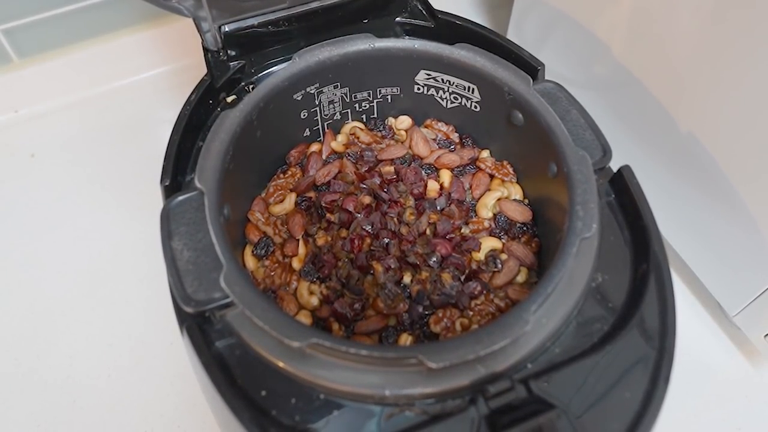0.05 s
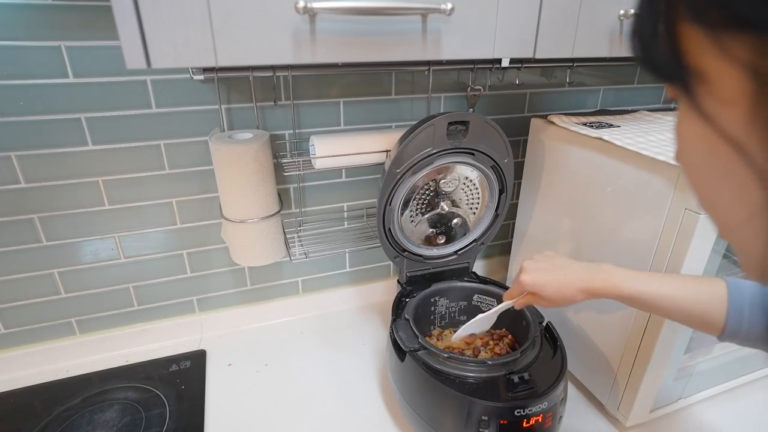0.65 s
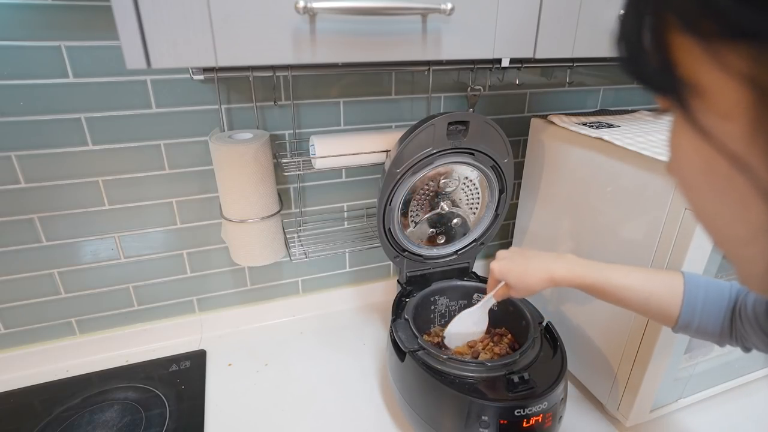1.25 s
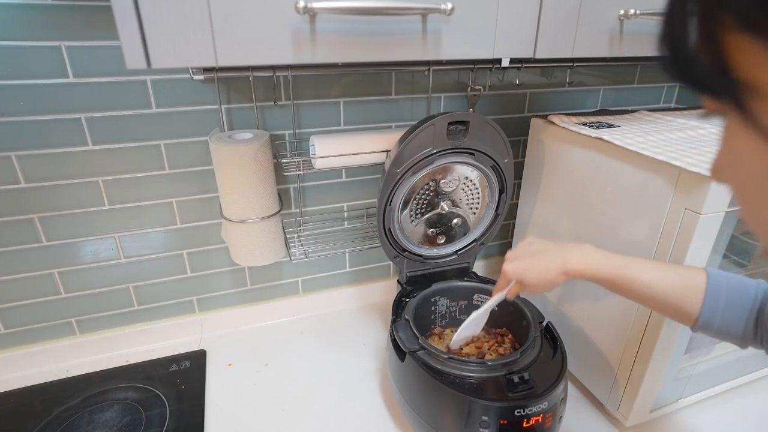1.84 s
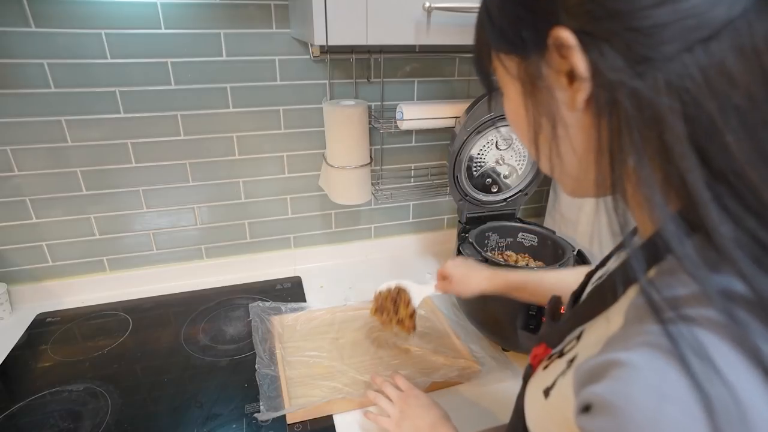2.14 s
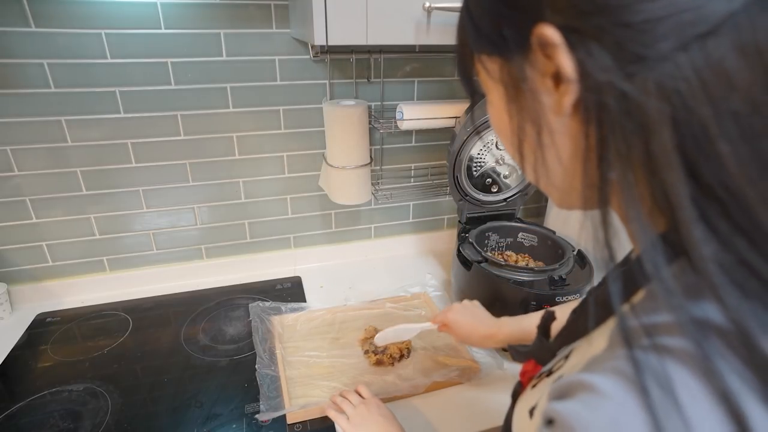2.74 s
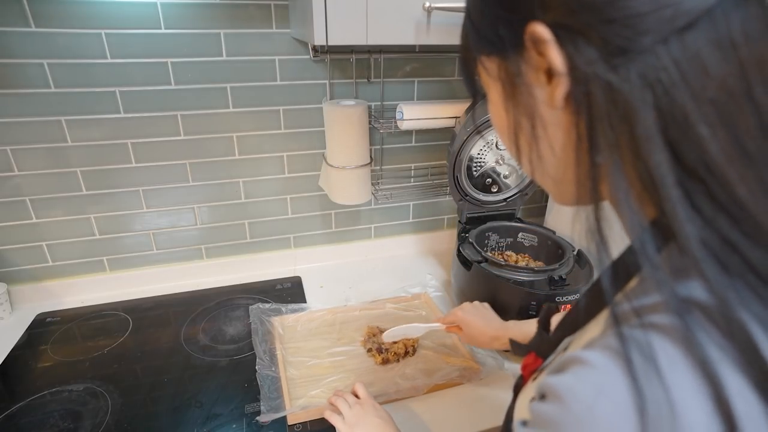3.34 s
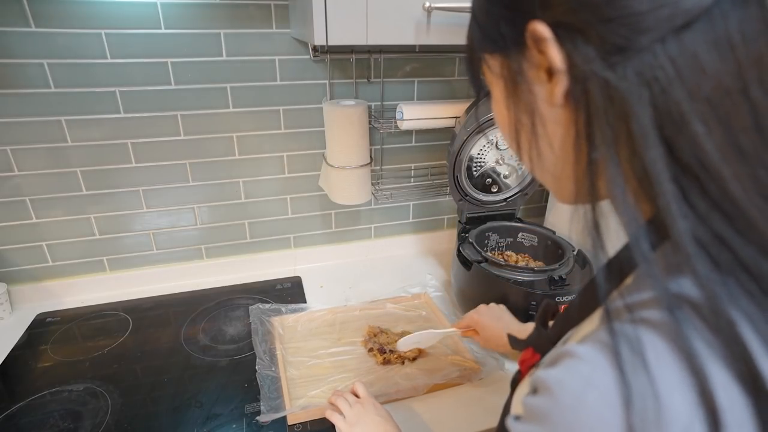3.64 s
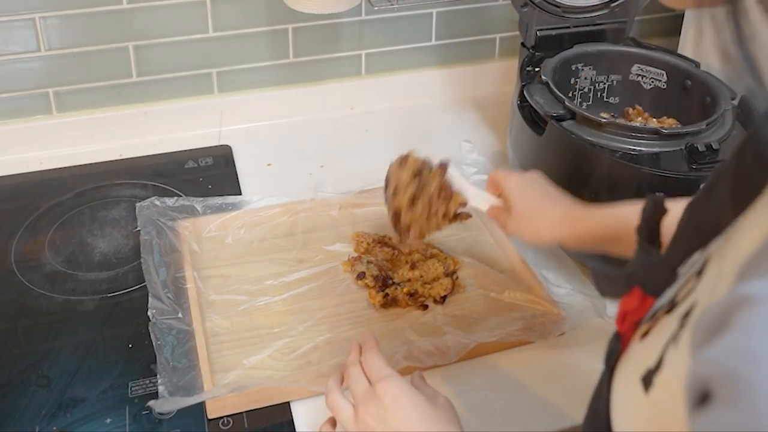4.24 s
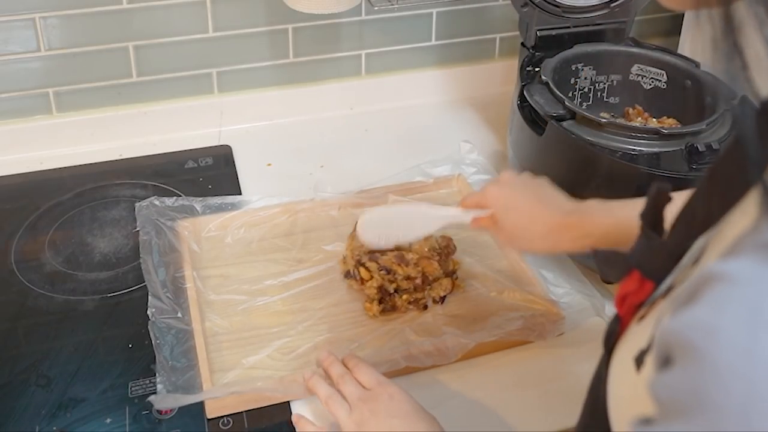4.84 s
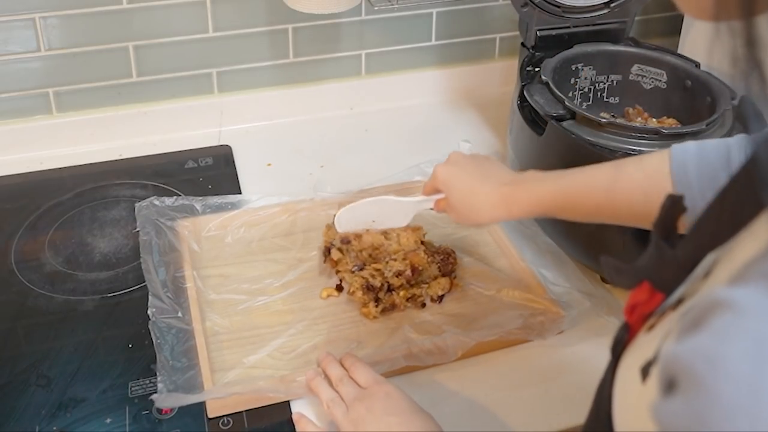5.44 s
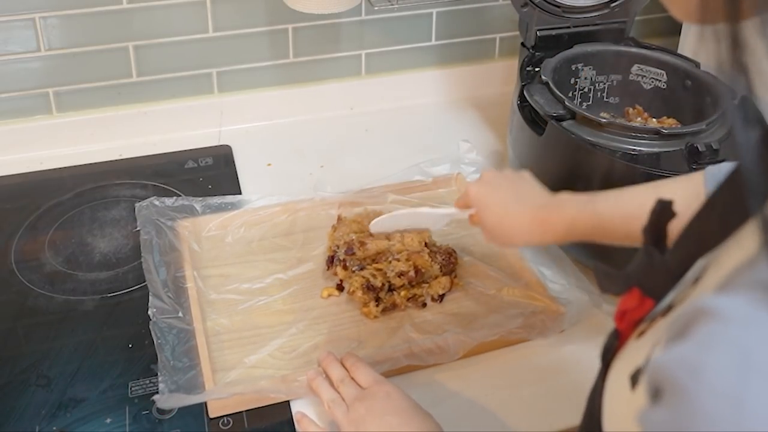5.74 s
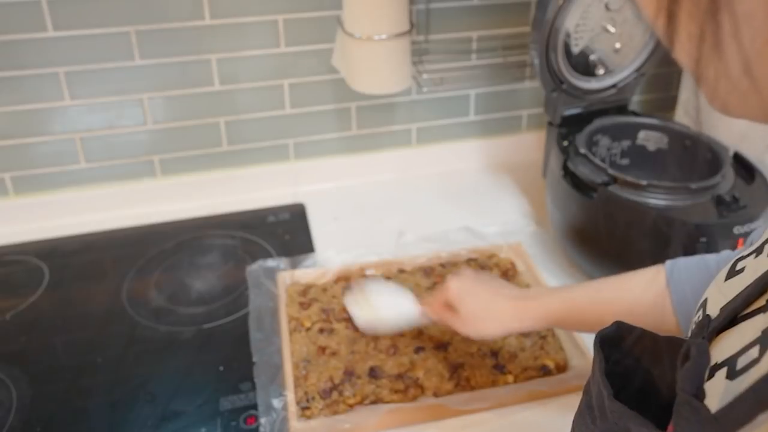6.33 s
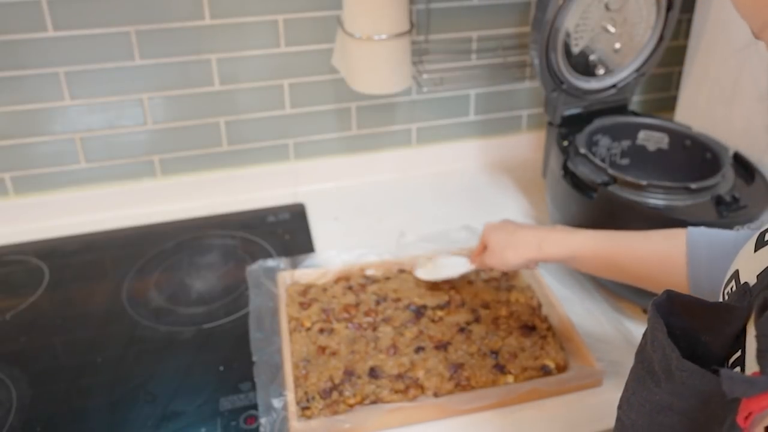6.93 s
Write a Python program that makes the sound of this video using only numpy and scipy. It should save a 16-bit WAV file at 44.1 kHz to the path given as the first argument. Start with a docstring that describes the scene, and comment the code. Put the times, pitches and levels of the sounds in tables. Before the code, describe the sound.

After a soft hiss, thin whine and small ticks from a rice cooker, a plastic paddle knocks dully in the pot and drags through sticky rice. The rice crackles and squishes as it is pressed onto a wooden tray lined with plastic film. Near the end the paddle knocks hard on the tray and raps it several more times. Everything is close and almost mono, with a short echo from a small tiled kitchen.

```python
"""First come a soft hiss, a thin whine, small ticks and a brief rub on a rice cooker. Then a plastic
paddle knocks dully in the pot and drags through sticky rice. The rice lands on a wooden tray lined
with plastic film, and crackles and squishes as it is pressed and peeled. The paddle knocks on the
nearly empty tray, and at the end raps on the packed one. Each blow makes the pot or tray ring, and
a small tiled kitchen echoes it. Everything is close and almost mono."""
import sys
import numpy as np
from scipy import signal
from scipy.fft import rfft, irfft, next_fast_len
from scipy.io import wavfile
from scipy.ndimage import uniform_filter1d

SR = 44100
rng = np.random.default_rng(int(sys.argv[2]) if len(sys.argv) > 2 else 0)


def output_pcm(signal):
    """Save a mono or channel-first signal as 16-bit PCM at the path in sys.argv[1].

    Samples are clipped to [-1, 1] before scaling.
    """
    pcm = np.clip(np.atleast_2d(signal).T, -1, 1) * 32767
    wavfile.write(sys.argv[1], SR, np.round(pcm).astype(np.int16))


N = 312265

# Blows of the paddle. Each row: start in seconds, level in dB, treble in dB (higher is brighter).
POT_BLOWS = [(0.636, -32, -19.5), (0.887, -13.5, -26.5), (0.949, -15, -9), (0.953, -9, -18.5),
             (0.96, -10, -24.5), (1.059, -26.5, -24), (1.283, -25.5, -31), (1.414, -37, -29),
             (1.454, -31.5, -33), (1.546, -14.5, -16.5), (1.563, -12.5, -20), (1.574, -5.5, -24.5),
             (1.595, -13.5, -24.5), (1.711, -19, -23)]
EMPTY_TRAY_BLOWS = [(2.284, -13.5, -22.5), (2.409, -16, -17), (3.255, -37.5, -20), (5.767, -8, -13),
                    (5.774, 3, -9.5), (6.046, -2.5, -10.5), (6.05, 1.5, -12.5), (6.063, -1.5, -26.5),
                    (6.068, -1, -21.5), (6.075, -9, -13)]
PACKED_TRAY_BLOWS = [(6.424, -9, -10), (6.637, -29.5, -2.5), (6.656, 2.5, -9), (6.731, -20, -10),
                     (6.872, 0, -10), (6.974, -10.5, -9)]
# Lighter touches. Each row: start in seconds, level in dB.
TIP_TAPS = [(6.4242, -7)]
COOKER_RUBS = [(0.27, -27)]
# Small ticks and a faint knock by the cooker, then snaps of film and sticky grains.
# Each row: start in seconds, level in dB, pitch in Hz.
TICKS_AND_SNAPS = [(0.125, -27, 8240), (0.17, -24.5, 6800), (0.171, -32.5, 700), (0.2377, -26, 7460),
                   (0.3763, -29.5, 3750), (0.402, -34.5, 2000), (0.476, -32, 1760), (1.192, -26.5, 2340),
                   (1.697, -26, 6000), (2.658, -27, 12000), (3.2782, -29, 11960), (3.4972, -23, 13300),
                   (4.3858, -19, 8720), (4.375, -6, 8000), (4.413, -16.5, 7600), (4.4236, -7.5, 11100),
                   (5.002, -30, 2130), (5.441, -19.5, 8540)]
# Strokes that swell and fade. Each row: start in seconds, rise time in seconds, level in dB.
DIG_STROKES = [(.97, .06, -58), (1.08, 0.088, -45.5), (1.19, 0.065, -52), (1.62, 0.11, -44.5),
               (1.73, 0.053, -48.5), (1.87, 0.064, -51.5)]  # through the rice in the pot
PRESS_STROKES = [(2.264, 0.016, -26.5), (2.33, 0.083, -31.5), (2.47, 0.023, -38.5), (2.56, 0.063, -45),
                 (2.651, .011, -39), (2.69, 0.026, -29.5), (2.79, .047, -29.5), (3.085, 0.075, -33.5),
                 (3.22, 0.046, -39.5), (3.325, 0.01, -45), (3.38, 0.07, -33), (3.49, 0.027, -34),
                 (3.668, 0.041, -38.5), (4.502, 0.006, -45.5), (4.73, 0.082, -49), (4.86, 0.055, -44),
                 (4.99, 0.01, -43.5), (5.03, 0.077, -43.5), (5.11, .085, -40.5), (5.235, 0.03, -42.5),
                 (5.428, .014, -39), (5.45, 0.034, -40), (5.555, 0.016, -44), (5.71, 0.074, -32.5),
                 (5.815, 0.037, -34), (6.0, 0.097, -32.5), (6.125, 0.013, -37.5)]  # pressing or peeling rice on the film
SQUISH_STROKES = [(2.272, 0.0094, -30.5), (2.395, 0.022, -37), (3.415, 0.027, -42), (5.14, 0.019, -33),
                  (5.185, .035, -41)]  # flattening the lump
LANDING_STROKES = [(4.371, 0.0023, -38), (4.405, 0.011, -43.5)]  # a scoop settling on the film

# The notes heard when each object is struck; the tray's include a few likely from the worktop or room.
# Each row: pitch in Hz, level in dB, seconds to fade by 60 dB.
POT_NOTES = [(98.6, -21, 0.25), (133, -18, 0.14), (195, -14.5, 0.15), (243.6, 2, 0.072), (278, -11, 0.14),
             (327, -3.5, 0.11), (416, -9, 0.052), (438, 9.5, 0.032), (576, 0, 0.034), (647, -4.5, 0.11),
             (909, -0.5, 0.095), (1190, 14.5, 0.023)]
EMPTY_TRAY_NOTES = [(303.7, -12, 0.073), (494, -37, 0.018), (564.5, -3.5, 0.056), (652.7, 1, 0.092),
                    (796, -3.5, 0.066), (886, -15.5, 0.14), (1103, -3, 0.03), (1380, -9, 0.057),
                    (1710, 1, 0.028), (1803, -8.5, 0.031), (2120, -25, 0.032), (2340, -4, .025),
                    (2664, -3, 0.06), (3080, -33, 0.026)]
PACKED_TRAY_NOTES = [(432, -24, 0.13), (573.7, 2, 0.095), (600.4, 0.5, 0.088), (663, -16, 0.26),
                     (791, -20, 0.11), (907, -21, 0.084), (1026, -1, 0.027), (1150, 3, 0.023),
                     (1440, -22, 0.0077), (1770, -8, 0.071), (2110, -18.5, 0.039), (2447, -3, 0.035),
                     (2750, -45, 0.01), (4000, -9, 0.0062)]
TIP_NOTES = [(1466, -8, 0.057), (1526, -6, 0.043), (3710, -1, 0.0073), (4270, -5.5, 0.015),
             (10500, -8, 0.0044)]
BLADE_NOTES = [(620, -6.5, 0.071), (714, 1.5, 0.13), (804, -7, .07), (922, 3, 0.075), (1370, -13, .03),
               (1770, -3, 0.025)]
COOKER_NOTES = [(548, 2.5, 0.028), (820, -8, .02), (1100, 5, .03), (1140, -4, 0.058)]

# The tone colour of each noise, from bass to treble. Each row: frequency in Hz, strength there in dB.
POT_CLACK_COLOUR = [(150, -18.5), (600, 0), (1900, -1), (3200, -8), (5000, -15), (9000, -14.5),
                    (16000, -25)]  # the paddle's own short ring, on the pot
TRAY_CLACK_COLOUR = [(150, -26.5), (600, -8.5), (1500, 1), (2600, -5.5), (4300, -13), (6000, -22.5),
                     (9000, -33), (16000, -45)]  # the same, on the tray
CRACKLE_COLOUR = [(180, -51), (300, -18.5), (656, -9.5), (885, -9.5), (1100, -11.5), (1230, -9),
                  (1640, -9.5), (1900, -9.5), (2030, -8.5), (3830, -7.5), (14500, -4.5), (16000, -5.5)]
DRAG_COLOUR = [(35, -41.5), (60, -6), (202, -1.5), (255, -20), (327, 3), (396, -3), (778, -15), (1500, -15),
               (2120, -15.5), (3240, -27), (6000, -22), (7800, -51), (13200, -120)]
SQUISH_COLOUR = [(35, -55), (60, -18.5), (279, -16.5), (322, -5.5), (428, -15.5), (594, 1.5), (932, -8.5),
                 (1220, -3.5), (1560, -16.5), (1760, -3), (2160, -20), (2540, -13), (8000, -30),
                 (10400, -55), (17600, -120)]
CRINKLE_COLOUR = [(300, -20), (1200, -10), (2500, -5.5), (4500, -2), (9000, -3), (16000, -6.5)]
THUD_COLOUR = [(25, -17), (60, -14), (120, -7), (190, 1.5), (280, 1), (500, -23), (2000, -80)]
ECHO_COLOUR = [(100, 8.5), (300, 9), (570, -3.5), (900, 4), (1300, -4), (3500, -1.5), (9000, 3),
               (16000, -0.5)]
ROOM_HISS_COLOUR = [(12, -41), (20, -7.5), (98, -6), (198, -9), (388, -8.5), (698, -8.5), (897, -7),
                    (1660, -14), (1910, -15.5), (2460, -13), (2670, -15), (6010, -16.5), (7950, -12),
                    (10200, -16.5), (16000, -10.5)]
EARLY_HISS_COLOUR = [(12, -23), (20, 3.5), (802, -5), (897, -7.5), (1030, -2.5), (1860, -5.5),
                     (2260, -7.5), (3340, -6.5), (6010, -7.5), (8180, -1.5), (9950, -9), (13900, -3),
                     (16000, -6)]
RUMBLE_COLOUR = [(25, -24), (60, -1), (110, -2), (250, -8), (700, -17), (3000, -45), (16000, -71.5)]

# How long the kitchen echoes. Each row: frequency in Hz, seconds to fade by 60 dB.
ECHO_TIMES = [(150, 0.54), (550, 0.46), (1400, 0.51), (3700, 0.46), (10000, 0.42), (16000, 0.57)]
# A thin electrical whine. Each row: multiple of WHINE_HZ, level in dB after the first 0.38 s.
WHINE_TONES = [(5, -74.5), (9, -78), (18, -70.5), (20, -76.5), (21, -82), (22, -72), (23, -78), (25, -73),
               (34, -80), (36, -77), (37, -76), (40, -79)]
# How wide the hiss is. Each row: frequency in Hz, level of the sides against the middle in dB.
HISS_WIDTH = [(60, -3.5), (110, -7), (200, -6.5), (380, -8), (700, -11.5), (1290, -11.5), (2380, -9.5),
              (4400, -7), (8120, -10.5), (15000, -10)]

WHINE_HZ, TOP_HZ = 375, 15900


def paddle_knocks(blows, notes, clack_colour, ring_db, clack_db, clack_fade_s, contact_hz, low_cut_hz,
                  echo_db, ring_echo_db):
    """Each blow rings the pot or tray and clacks the paddle; harder contact sounds brighter."""
    track, t = np.zeros(N), np.arange(SR // 7) / SR
    bass_cut = signal.butter(3, low_cut_hz, "high", fs=SR)  # a small object gives off little bass
    for start, db, treble_db in blows:
        body = amp(db + ring_db) * ring(notes, t, contact_hz * amp(treble_db / 2))
        clack_fade = amp(db + clack_db + treble_db - 60 * t / clack_fade_s)
        clack = clack_fade * coloured(rng.standard_normal(len(t)), clack_colour)
        body, clack = signal.lfilter(*bass_cut, [body, clack])
        add(track, start, body + clack)
        # The echo takes more of the clack than of the ring, so it sounds like a broad wash.
        add(track, start, kitchen_echo(amp(ring_echo_db) * body + clack, echo_db))
    return track


def tip_click():
    """The paddle's tip catches the tray's frame and rings with a short, bright click."""
    track, t = np.zeros(N), np.arange(SR // 7) / SR
    for start, db in TIP_TAPS:
        click = amp(db + 0.5) * ring(TIP_NOTES, t, contact_hz=15000)
        add(track, start, click)
        add(track, start, kitchen_echo(click))
    return track


def blade_judder(start_s=6.08, length_s=0.18, level_db=-27, fade_db_per_s=85):
    """After a burst of hard blows the blade skips across the film; each tiny slip makes it ring."""
    t, age = np.arange(SR // 7) / SR, np.arange(N) / SR - start_s
    touching = (age > 0) * (age < length_s)
    pressure = touching * amp(level_db - fade_db_per_s * np.abs(age))
    slips = pressure * ticks(per_second=460, spread_db=1.5)
    bass_cut = signal.butter(2, 450, "high", fs=SR)
    blade = signal.lfilter(*bass_cut, ring(BLADE_NOTES, t, contact_hz=1954))
    return signal.fftconvolve(slips, blade / np.linalg.norm(blade))[:N]


def sticky_rice(fizz_hz=9500):
    """Rice drags along the pot's wall and crackles on the film; a strong peel adds a finer fizz."""
    digging = strokes(DIG_STROKES, fade_db_per_s=111)
    pressing = strokes(PRESS_STROKES, fade_db_per_s=145)
    crackle = sticky_crackle()
    fizz = unit(filtered(crackle, lambda hz: 1 / (1 + (fizz_hz / (hz + 1)) ** 4)))
    fizz_gain = amp(-6) * np.sqrt(pressing / amp(-31))
    drag = coloured(ticks(per_second=400, spread_db=0), DRAG_COLOUR)
    in_pot = digging * (amp(1) * drag + amp(-11) * crackle)
    on_film = pressing * (amp(-2) * crackle + fizz_gain * fizz)
    return in_pot + on_film


def sticky_crackle():
    """Thousands of wet contacts let go in clumps and blur into a hiss; a few stand out."""
    clumps = np.interp(np.arange(N), np.linspace(0, N, N // 350), rng.standard_normal(N // 350))
    fine = ticks(per_second=5000, spread_db=3.5) * amp(2.3 * clumps)
    standouts = amp(-11) * ticks(per_second=130, spread_db=2.5)
    blur = amp(-3) * rng.standard_normal(N)
    return coloured(fine + standouts + blur, CRACKLE_COLOUR)


def rice_squish():
    """Soft grains collapse against the wood as the lump is flattened."""
    pressure = amp(-1) * strokes(SQUISH_STROKES, fade_db_per_s=215)
    return pressure * coloured(ticks(per_second=2000, spread_db=5.5), SQUISH_COLOUR)


def ticks_and_snaps(decay_s=0.00045, sharpness=0.56):
    """Ticks and a faint knock by the cooker; later a crease of film flips or a starch thread breaks."""
    track, t = np.zeros(N), np.arange(SR // 50) / SR
    for start, db, pitch_hz in TICKS_AND_SNAPS:
        burst = rng.standard_normal(len(t)) * np.exp(-t / decay_s)
        # Keep a broad band around the pitch.
        click = filtered(
            burst, lambda hz: (1 + 1j * sharpness * (hz / pitch_hz - pitch_hz / (hz + 1))) ** -2)
        add(track, start, amp(db - 1) * click / np.max(np.abs(click)))
    return track + kitchen_echo(track)[:N]


def film_crinkle():
    """Small creases in the film give way as a scoop of rice lands on it."""
    weight = amp(1) * strokes(LANDING_STROKES, fade_db_per_s=172)
    return weight * coloured(ticks(per_second=1500, spread_db=3.5), CRINKLE_COLOUR)


def cooker_rub(length_s=0.013):
    """A brief rub on the cooker's shell gives one rough, hollow note."""
    track, t = np.zeros(N), np.arange(SR // 7) / SR
    for start, db in COOKER_RUBS:
        friction = rng.standard_normal(len(t)) * np.exp(-(t / length_s) ** 4)
        rub = signal.fftconvolve(friction, ring(COOKER_NOTES, t, contact_hz=1550))
        add(track, start, amp(db) * rub / np.max(np.abs(rub)))
    return track + kitchen_echo(track)[:N]


def counter_thuds(empty_db=-46, packed_db=-50, fade_s=0.29):
    """Each blow on the tray passes a soft, low thud to the counter; packed rice cushions it."""
    track, t = np.zeros(N), np.arange(SR // 3) / SR
    for blows, gain_db in (EMPTY_TRAY_BLOWS, empty_db), (PACKED_TRAY_BLOWS, packed_db):
        for start, db, _ in blows:
            thud = coloured(rng.standard_normal(len(t)), THUD_COLOUR)
            add(track, start, amp(db + gain_db - 60 * t / fade_s) * thud)
    return track


def kitchen_echo(sound, echo_db=-6, build_s=0.00045):
    """The tiled walls throw a sound back as a fading wash, a little different for every spot."""
    hz, t, noise = signal.stft(rng.standard_normal(SR * 2 // 5), SR, nperseg=256)
    tail_db = value_at(ECHO_COLOUR, hz)[:, None] - 60 * t / value_at(ECHO_TIMES, hz)[:, None]
    _, tail = signal.istft(noise * amp(tail_db), SR, nperseg=256)
    age = np.arange(len(tail)) / SR
    tail *= 1 - np.exp(-(age / build_s) ** 2)
    return amp(echo_db) * signal.fftconvolve(sound, tail / np.linalg.norm(tail))


def background(early_until_s=0.38, early_whine_db=10, rumble_from_s=6.424):
    """Hiss and a thin whine, stronger for the first 0.38 s and then dropping; a low rumble under the last raps."""
    t = np.arange(N) / SR
    early = uniform_filter1d(1. * (t < early_until_s), size=400)
    whine = sum(amp(db) * np.sqrt(2) * np.sin(2 * np.pi * (multiple * WHINE_HZ * t + rng.random()))
                for multiple, db in WHINE_TONES)
    whine *= amp(early * early_whine_db)
    room_hiss = amp(-56.5) * coloured(rng.standard_normal((2, N)), ROOM_HISS_COLOUR)
    early_hiss = amp(-46.5) * coloured(rng.standard_normal((2, N)), EARLY_HISS_COLOUR)
    middle, side = (1 - early) * room_hiss + early * early_hiss
    side = filtered(side, lambda hz: amp(value_at(HISS_WIDTH, hz)))
    rumble = amp(-55) * (t > rumble_from_s) * coloured(rng.standard_normal(N), RUMBLE_COLOUR)
    return middle + whine + rumble + np.array([side, -side])


def ring(notes, t, contact_hz):
    """The fading notes heard after a blow, with a peak of 1; those above contact_hz are softened."""
    hz, db, fade_s = np.transpose(notes)[:, :, None]
    tones = amp(db - 60 * t / fade_s) * np.cos(2 * np.pi * hz * t)
    treble_cut = signal.butter(3, min(contact_hz, TOP_HZ), fs=SR)
    sound = signal.lfilter(*treble_cut, tones.sum(axis=0))
    return sound / np.max(np.abs(sound))


def strokes(table, fade_db_per_s, hold_s=0.0052, let_go_db=3, let_go_s=0.012):
    """Loudness over time: each stroke swells, holds, drops quickly as the rice lets go, then fades."""
    t, power = np.arange(N) / SR, np.zeros(N)
    for start, rise_s, db in table:
        part = slice(round(start * SR), round(start * SR) + SR // 2)
        age = np.abs(t[part] - start)
        swell = np.minimum(age / rise_s, 1) ** 0.97
        since_hold = np.maximum(age - rise_s - hold_s, 0)
        drop_db = let_go_db * (1 - np.exp(-since_hold / let_go_s)) + fade_db_per_s * since_hold
        power[part] += (swell * amp(db - drop_db)) ** 2
    return np.sqrt(power)


def ticks(per_second, spread_db):
    """Tiny clicks at random times; a larger spread makes their sizes more uneven."""
    happens = rng.random(N) < per_second / SR
    size = amp(spread_db * np.clip(rng.standard_normal(N), -2.5, 2.5))
    return unit(happens * size * rng.choice([-1, 1], N))


def coloured(sound, colour):
    """Give a sound a tone colour, at an average level of 1."""
    return unit(filtered(sound, lambda hz: amp(value_at(colour, hz))))


def filtered(sound, gain_at):
    """Turn each frequency of a sound up or down by gain_at(hz)."""
    length = sound.shape[-1]
    padded = next_fast_len(length + 8192)
    hz = np.fft.rfftfreq(padded, 1 / SR)
    return irfft(rfft(sound, padded) * gain_at(hz), padded)[..., :length]


def value_at(table, hz):
    """Read between the rows of a frequency table, with octaves evenly spaced."""
    row_hz, values = np.transpose(table)
    return np.interp(np.log(hz + 1), np.log(row_hz + 1), values)


def amp(db):
    """Turn decibels into a number to multiply by."""
    return 10 ** (np.asarray(db) / 20)


def unit(sound):
    """Scale a sound to an average (rms) level of 1."""
    return sound / np.sqrt(np.mean(sound ** 2) + 1e-20)


def add(track, start_s, sound):
    """Mix a sound into a track at a given time."""
    part = track[max(round(start_s * SR), 0):][:len(sound)]
    part += sound[:len(part)]


def scene():
    """All the work happens straight ahead of the listener; only the hiss spreads to the sides."""
    pot = paddle_knocks(
        POT_BLOWS, POT_NOTES, POT_CLACK_COLOUR, ring_db=-3.5, clack_db=2.5,
        clack_fade_s=0.052, contact_hz=2270, low_cut_hz=71, echo_db=-4, ring_echo_db=-6)
    empty_tray = paddle_knocks(
        EMPTY_TRAY_BLOWS, EMPTY_TRAY_NOTES, TRAY_CLACK_COLOUR, ring_db=-1, clack_db=-3.5,
        clack_fade_s=0.041, contact_hz=3990, low_cut_hz=443, echo_db=-5, ring_echo_db=-4.5)
    packed_tray = paddle_knocks(
        PACKED_TRAY_BLOWS, PACKED_TRAY_NOTES, TRAY_CLACK_COLOUR, ring_db=1.5, clack_db=0,
        clack_fade_s=0.039, contact_hz=3790, low_cut_hz=169, echo_db=-3, ring_echo_db=-8)
    knocks = pot + empty_tray + packed_tray + tip_click() + counter_thuds()
    rubs = blade_judder() + cooker_rub()
    rice = sticky_rice() + rice_squish()
    return knocks + rubs + rice + ticks_and_snaps() + film_crinkle() + background()


def record(dry):
    """The hardest blows just clip, and everything above TOP_HZ is cut away."""
    return filtered(np.clip(dry, -1, 1), lambda hz: hz < TOP_HZ)


dry = scene()
out = record(dry)
output_pcm(out)
```